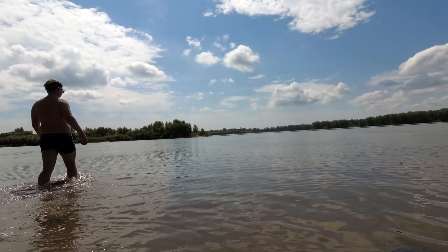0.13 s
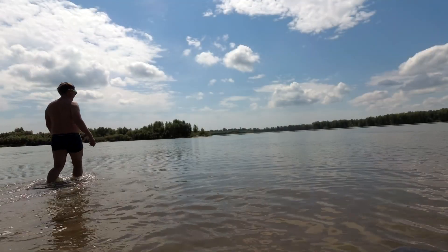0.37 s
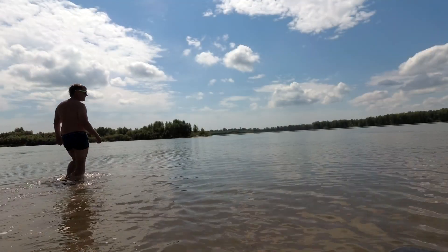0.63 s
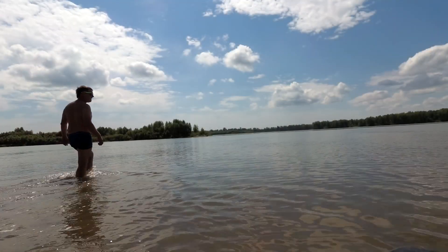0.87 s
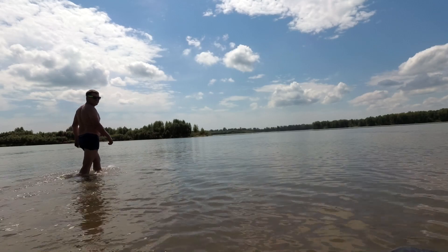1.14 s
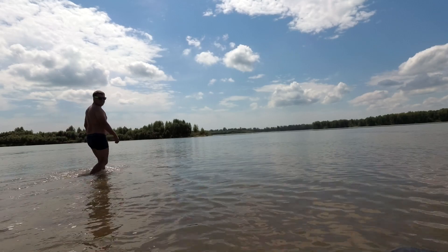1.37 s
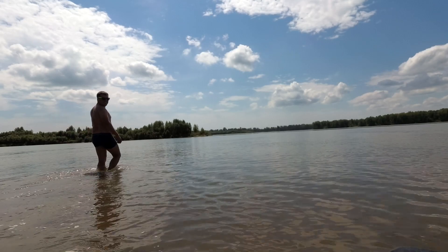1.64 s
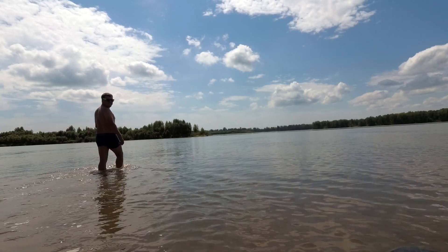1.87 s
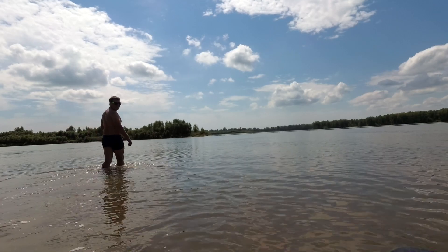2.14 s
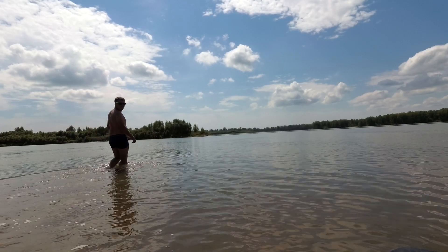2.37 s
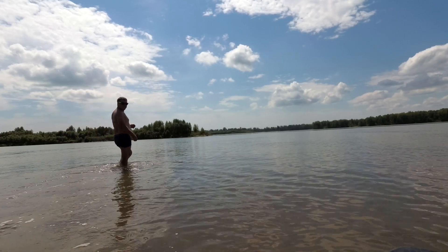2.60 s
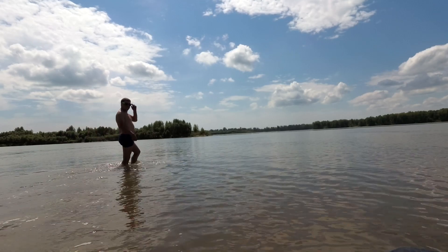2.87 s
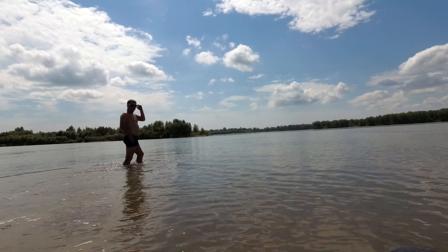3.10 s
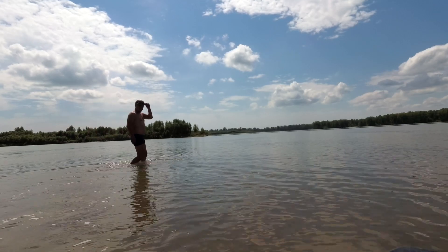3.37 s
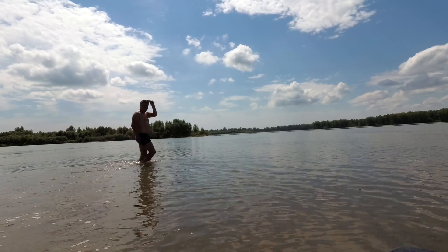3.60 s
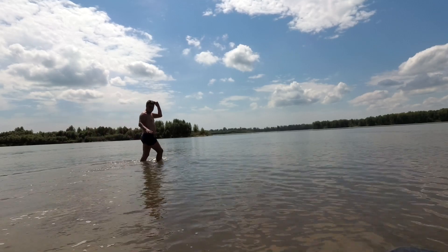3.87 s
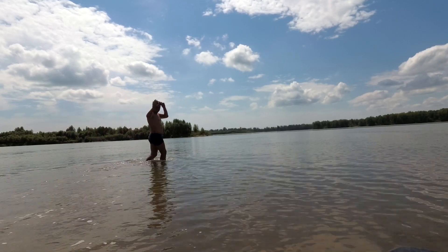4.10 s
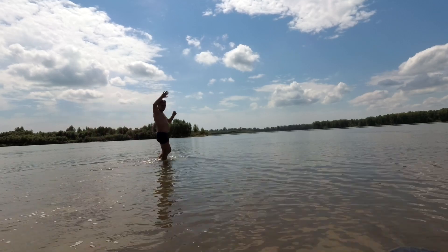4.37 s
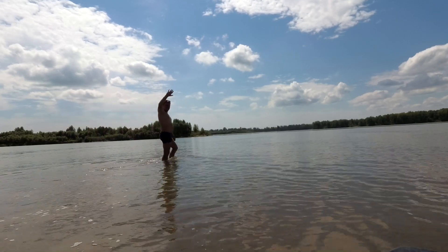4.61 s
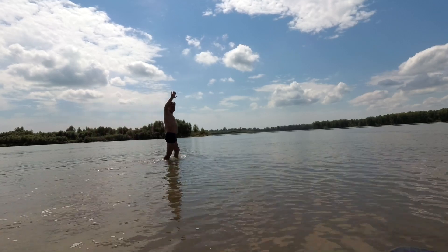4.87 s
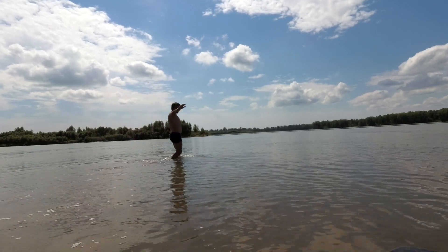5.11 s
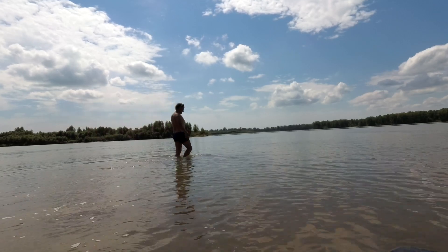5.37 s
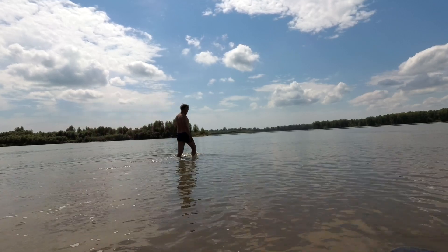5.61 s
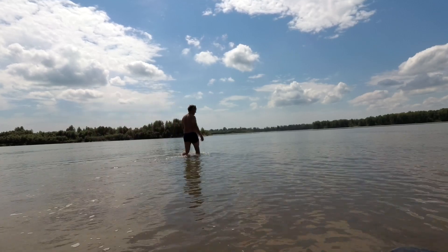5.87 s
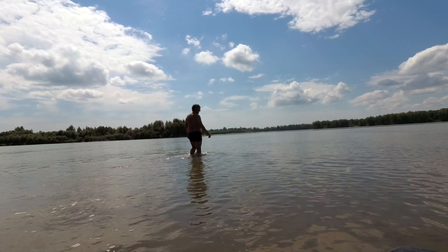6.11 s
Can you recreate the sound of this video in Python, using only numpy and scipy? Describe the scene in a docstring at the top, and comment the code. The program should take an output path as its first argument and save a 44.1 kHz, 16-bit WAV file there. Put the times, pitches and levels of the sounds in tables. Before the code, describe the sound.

Someone wades away through shallow river water, each stride sloshing, gurgling and splashing, while soft low wind thumps buffet the microphone, mostly on the right.

```python
"""A shallow river: a person wades away through it, a few metres from a small camera with two microphone ports.
Each stride stirs up ringing bubbles, slaps made of short noise bursts, and a crowd of tiny spray bubbles.
Wind eddies thump on the ports, mostly the right one, as soft low pulses over a lumpy rumble.
Under it lie coloured microphone hiss and a faint whine that ticks with the camera's frame clock."""
import sys
import numpy as np
from scipy import signal
from scipy.fft import rfft, irfft
from scipy.io import wavfile
from scipy.ndimage import uniform_filter1d

SR = 44100
rng = np.random.default_rng(int(sys.argv[2]) if len(sys.argv) > 2 else 0)


def gain_from_db(level_db):
    """Convert decibel levels to linear amplitude factors (20 dB per decade)."""
    decades = np.asarray(level_db, float) / 20
    return 10 ** decades


def dump(signal):
    """Clip the signal to [-1, 1] and save it as 16-bit WAV at the path in sys.argv[1]."""
    limited = np.clip(np.atleast_2d(signal).T, -1, 1)
    pcm = np.round(limited * 32767).astype(np.int16)
    wavfile.write(sys.argv[1], SR, pcm)


N = 275007  # samples in the scene


def evened(x):
    """Scales a signal to an average (rms) size of 1."""
    return x / np.sqrt(np.mean(x ** 2) + 1e-20)


def read(points, hz, column=1):
    """Reads a spectrum table between its rows, on a log-frequency axis."""
    table = np.transpose(points)
    return np.interp(np.log(hz + 1), np.log(table[0] + 1), table[column])


def curve(rows, column, t=None):
    """Reads one column of a time table, for every sample or for the times t."""
    table = np.transpose(rows)
    times = np.arange(N) / SR if t is None else t
    return np.interp(times, table[0], table[column])


def add(mix, s, sound):
    """Mixes a sound in from second s."""
    start = round(s * SR)
    sound = sound[max(-start, 0):]
    part = mix[max(start, 0):][:len(sound)]
    part += sound[:len(part)]


def noise(points, size, patchy_db, same):
    """Two channels of noise with a spectrum, drifting patches and a left-right likeness; rms 1 overall."""
    hz = np.fft.rfftfreq(size, 1 / SR)
    a, b, c, d, patches = rng.standard_normal((4 * N // size + 5, len(hz), 5)).T
    patches = uniform_filter1d(patches, size=8, axis=0)
    patches = evened(uniform_filter1d(patches, size=6, axis=1))
    likeness = np.clip(same(hz), -1, 1)[:, None]
    left = a + 1j * b
    right = likeness * left + np.sqrt(1 - likeness ** 2) * (c + 1j * d)
    z = np.array([left, right]) * gain_from_db(read(points, hz)[:, None] + patchy_db * patches)
    return evened(signal.istft(z, nperseg=size, noverlap=3 * size // 4)[1][:, :N])


# colour of the hiss: (frequency [Hz], relative level [dB])
HISS_COLOUR = [(180, -50), (300, -21.5), (565, -25.5), (749, 6), (842, -16), (1870, -19.5), (2400, -18),
               (10000, -20.5), (16000, -11)]
# how alike the hiss is at both ports: (frequency [Hz], likeness [0 to 1])
HISS_LIKENESS = [(300, 0.16), (1000, 0.71), (2500, 0.036), (6000, 0.64), (10000, 1), (13000, 0.12)]
# extra colour of the right port's hiss: (frequency [Hz], gain [dB])
HISS_RIGHT_GAIN = [(300, -12.5), (1800, 2.5), (3000, -1), (9000, 0), (14000, -2.5)]


def hiss(level_db=-53):
    """Microphone hiss and the far wash of the river: steady noise, partly shared by the two ports."""
    left, right = gain_from_db(level_db) * noise(HISS_COLOUR, 1024, 0.66, lambda hz: read(HISS_LIKENESS, hz))
    right_gain = gain_from_db(read(HISS_RIGHT_GAIN, np.fft.rfftfreq(N, 1 / SR)))
    return np.array([left, irfft(rfft(right) * right_gain, N)])


def thin_hiss(db=-70, low_hz=11700, high_hz=13400, start=4.61, end=5.45):
    """A faint band of treble noise that fades in and out once, louder on the left."""
    band = signal.butter(3, [low_hz, high_hz], "band", fs=SR, output="sos")
    sound = evened(signal.sosfilt(band, rng.standard_normal(N)))
    fade_s = [start - .05, start + .05, end - .1, end + .05]
    fade = np.interp(np.arange(N) / SR, fade_s, [0, 1, 1, 0])
    return sound * gain_from_db(db) * fade * gain_from_db([[3], [-6]])  # left and right gain, dB


# twin tones before some frames: (frequency [Hz], level before the left and right gains [dB])
PIP_TONES = [(12075, -60), (13835, -60)]
# how often the twin tones sound: (time [s], share of frames [0 to 1])
PIP_SHARE = [(0, .95), (.85, 1), (.95, 0.66), (4.55, 0.58), (4.62, 0.1), (5.42, .1), (5.48, 1), (5.76, 1),
             (5.79, 0.35), (6.24, 0.56)]


def whine(line_hz=15703, line_db=-70, waver_hz=6, tick_db=-58, tick_hz=15500, tick_ms=1.5):
    """A thin wavering line, a tick at every frame and short twin tones before some frames, louder on the left."""
    frame_hz, first_frame_s = 29.968, 0.0204
    pip_ms, pip_lead_ms = 4, 10.5
    t = np.arange(N) / SR
    frames = (t - first_frame_s) * frame_hz
    from_tick_ms = 1000 * ((frames + .5) % 1 - .5) / frame_hz
    # one chance and one phase for each frame
    chance, phase = rng.random((200, 2))[np.round(frames).astype(int)].T
    waver = waver_hz * evened(uniform_filter1d(rng.standard_normal(N), size=4000))
    line = gain_from_db(line_db) * np.sin(2 * np.pi * np.cumsum(line_hz + waver) / SR)
    tick_shape = np.exp(-(from_tick_ms / tick_ms) ** 2)
    ticks = gain_from_db(tick_db) * tick_shape * np.sin(2 * np.pi * (tick_hz * t + phase))
    gate = (chance < curve(PIP_SHARE, 1)) * np.exp(-((from_tick_ms + pip_lead_ms) / pip_ms) ** 4)
    pips = gate * sum(gain_from_db(db) * np.sin(2 * np.pi * (hz * t + phase)) for hz, db in PIP_TONES)
    return (line + ticks + pips) * gain_from_db([[3], [-12]])  # left and right gain, dB


def thump(hz, cycles, phase):
    """One eddy passing a port: a soft push and pull under a bell-shaped swell, centred 2000 samples in."""
    t = np.arange(-2000, 2000) / SR
    return np.exp(-.5 * (t * hz / cycles) ** 2) * np.cos(2 * np.pi * (hz * t + phase))


# colour of the wind rumble: (frequency [Hz], relative level [dB])
RUMBLE_COLOUR = [(15, -40), (30, -0.5), (60, 3), (120, 2.5), (200, 4.5), (280, -9.5), (400, -36),
                 (700, -34)]
# strength of the rumble, before the low cut on the left: (time [s], left level [dB], right level [dB])
GUST_LEVELS = [(0.0, -44.5, -44.5), (0.62, -43.5, -43.5), (1.3, -40.5, -46), (1.7, -58, -44.5),
               (1.95, -54, -45), (2.24, -60, -59.5), (2.5, -61, -53), (2.8, -49, -40), (3.01, -62, -58.5),
               (3.34, -52, -43), (3.55, -58, -50.5), (3.78, -62, -50), (4.12, -62, -58), (4.34, -44, -46.5),
               (4.63, -54.5, -52), (4.9, -40.5, -42.5), (5.28, -58.5, -46), (5.59, -40, -40.5),
               (6.24, -55, -47.5)]
# the strongest eddies, before the low cut on the left:
# (time of the middle [s], level [dB], frequency [Hz], port [0 left, 1 right])
STRONG_EDDIES = [(0.04, -30, 173, 0), (0.195, -40, 171, 0), (0.214, -24.5, 220, 1), (0.279, -39, 171, 0),
                 (0.3, -25, 181, 0), (0.399, -28.5, 172, 0), (0.447, -25.5, 119, 1), (0.47, -43.5, 150, 0),
                 (0.608, -28, 166, 1), (1.075, -26.5, 190, 1), (1.121, -27.5, 173, 0), (1.329, -26, 257, 1),
                 (1.364, -27, 170, 1), (1.364, -20.5, 190, 0), (1.4, -19, 204, 1), (1.425, -20, 215, 1),
                 (1.515, -26, 179, 1), (1.571, -21.5, 159, 1), (1.7, -14.5, 205, 1), (1.804, -12.5, 230, 1),
                 (1.873, -13.5, 190, 1), (2.039, -13.5, 214, 1), (2.074, -29, 150, 1),
                 (2.371, -23.5, 174, 1), (2.504, -22.5, 158, 1), (2.536, -19, 191, 1), (2.672, -20, 205, 1),
                 (2.705, -22, 175, 1), (2.808, -27.5, 112, 1), (2.817, -25.5, 165, 0), (2.858, -25, 181, 1),
                 (3.069, -30.5, 146, 1), (3.236, -28, 166, 1), (3.29, -17, 177, 1), (3.391, -21, 180, 1),
                 (3.423, -25, 162, 1), (3.511, -26, 189, 1), (3.544, -27, 151, 1), (3.588, -33, 159, 1),
                 (4.342, -25.5, 171, 1), (4.395, -16.5, 183, 1), (4.519, -34, 155, 1),
                 (4.568, -24.5, 178, 1), (4.82, -12.5, 219, 1), (4.887, -15, 210, 1), (4.915, -25, 170, 1),
                 (4.952, -28, 194, 1), (5.052, -23.5, 200, 1), (5.072, -24, 142, 1), (5.114, -29, 158, 1),
                 (5.172, -29, 182, 1), (5.215, -27.5, 133, 1), (5.312, -31, 139, 1), (5.413, -20.5, 173, 1),
                 (5.439, -24, 193, 1), (5.462, -26, 123, 1), (5.496, -20.5, 197, 1), (5.673, -20, 168, 1),
                 (5.702, -26, 160, 1), (5.831, -23.5, 162, 1), (5.911, -28.5, 153, 1),
                 (5.966, -20.5, 197, 1)]


def wind(cycles=0.49, lump_db=5, lump_ms=18, push_db=-17, follower_db=-7, follower_ms=16, left_cut_hz=70):
    """Eddies roll over one port at a time, each with smaller ones around it, above a lumpy rumble."""
    lumps = evened(uniform_filter1d(rng.standard_normal((2, N)), round(lump_ms * SR / 1000)))
    rumble = noise(RUMBLE_COLOUR, 2048, 0.14, lambda hz: 0 * hz)  # unrelated at the two ports
    rumble = evened(rumble * gain_from_db(lump_db * lumps))
    out = rumble * gain_from_db([curve(GUST_LEVELS, 1), curve(GUST_LEVELS, 2)])
    for (s, db, hz, port), luck in zip(STRONG_EDDIES, rng.random((len(STRONG_EDDIES), 8))):
        at, start = out[int(port > .5)], s - 2000 / SR
        slow_push = gain_from_db(push_db) * thump(0.5 * hz, 0.16, luck[1])
        add(at, start, gain_from_db(db) * (thump(hz, cycles, luck[0]) + slow_push))
        # one smaller eddy before and one after
        for way, (phase, gap, pitch) in zip((-1, 1), luck[2:].reshape(2, 3)):
            small = gain_from_db(db + follower_db - 17.7 * gap) * thump(hz * (.7 + .7 * pitch), cycles, phase)
            add(at, start + way * follower_ms * (0.658 + 0.79 * gap) / 1000, small)
    # the left port is sheltered
    low_cut = signal.butter(2, left_cut_hz, "high", fs=SR, output="sos")
    out[0] = signal.sosfilt(low_cut, out[0])
    return out


# how the camera body colours the water at the right port:
# (frequency [Hz], gain [dB], phase ahead of the left [rad])
RIGHT_PORT_COLOUR = [(300, -3, 0.5), (500, -2.5, -0.15), (863, -1, 0.01), (910, -7.5, 1.25),
                     (1264, -1.5, -1.1), (1340, -4, 0.1), (1630, -12, -0.2), (1810, -7.5, 1.32),
                     (2400, 3.5, 2), (3250, 3, 0.83), (5300, 7.5, 1.9), (12100, 5.5, 2)]
# what changes with the wader's bearing: (time [s], left notch [Hz], mean lag of the left port [ms])
WADER_BEARING = [(0, 1040, -0.058), (3, 1130, -0.012), (4.5, 1256, 0.036), (6.24, 1235, 0.06)]


def at_ports(water, notch_db=12, notch_width_hz=50, scatter_ms=0.05):
    """The camera body cuts a notch at the left port and colours the right; notch and lag move with the bearing."""
    hz, t, z = signal.stft(water, SR, nperseg=1024, noverlap=768)
    hz = hz[:, None]
    notch = np.exp(-((hz - curve(WADER_BEARING, 1, t)) / notch_width_hz) ** 2)
    left = z * gain_from_db(-notch_db * notch)
    # the splashing is spread over some metres, so the lag between the ports wanders
    wander = uniform_filter1d(rng.standard_normal(z.shape), size=9, axis=0)
    wander = evened(uniform_filter1d(wander, size=3, axis=1))
    lag_ms = curve(WADER_BEARING, 2, t) + scatter_ms * wander
    turn = read(RIGHT_PORT_COLOUR, hz, column=2) + 2 * np.pi * hz * lag_ms / 1000
    right = z * gain_from_db(read(RIGHT_PORT_COLOUR, hz)) * np.exp(1j * turn)
    return signal.istft(np.array([left, right]), SR, nperseg=1024, noverlap=768)[1][:, :N]


# water slaps and drop impacts, before the burst is shaped and reaches the ports:
# (time [s], level [dB], brightest frequency [Hz])
SLAP_EVENTS = [(0.059, -32, 3830), (0.4978, -31.5, 3110), (0.5202, -21.5, 3200), (0.558, -32, 3240),
               (0.6132, -30, 4230), (0.6482, -29, 3120), (0.987, -34, 3100), (1.1157, -37.5, 5410),
               (1.6018, -35, 3150), (1.88, -38, 3170), (2.2712, -40, 5430), (2.4515, -30.5, 4000),
               (2.4637, -31.5, 7550), (2.5227, -31, 2980), (2.535, -39, 4180), (2.6173, -33, 3010),
               (2.726, -32, 3020), (2.821, -35.5, 3100), (3.5997, -40, 3270), (4.2384, -41, 3290),
               (4.6788, -39, 9600), (4.709, -34, 9150), (5.29, -30, 8860), (5.3998, -32, 3050),
               (5.959, -33, 6540), (6.118, -38, 4550), (6.152, -38, 5830)]


def slaps(width=0.25, skirt=0.47, rise_s=0.0033, decay_ms=3.46):
    """A drop or a sheet of water hits the surface: a ragged burst of bright noise."""
    out, t = np.zeros(N), np.arange(2048) / SR
    hz = np.fft.rfftfreq(2048, 1 / SR)
    shape = np.minimum(t / rise_s, 1) * np.exp(-1000 * t / decay_ms)
    draws = rng.standard_normal((len(SLAP_EVENTS), 2, 2048))
    for (s, db, top_hz), (burst, rag) in zip(SLAP_EVENTS, draws):
        peak = np.exp(-(np.log((hz + 1) / top_hz) / width) ** 2)
        colour = (skirt * (hz < 11000) + peak) * (hz > 1500)
        ragged = gain_from_db(2.2 * evened(uniform_filter1d(rag, size=60)))
        burst = evened(irfft(rfft(burst) * colour) * ragged)
        add(out, s, gain_from_db(db) * burst / 2 * shape)
    return out


# surges of water as a leg pushes or plants, levels relative:
# (start [s], length [s], middle bubbles [dB], large bubbles [dB], spray [dB])
LEG_SURGES = [(-0.05, 0.049, -29, -32, -46.5), (0.15, 0.085, -44, -61, -56), (0.469, 0.21, -40, -42, -51.5),
              (0.726, 0.38, -41.5, -34.5, -54), (1.554, 0.072, -43.5, -50, -55.5),
              (1.666, 0.23, -44, -37.5, -55.5), (1.98, 0.77, -53.5, -45.5, -63.5),
              (2.362, 0.15, -47.5, -47, -59), (2.59, 0.13, -44, -52.5, -58),
              (2.775, 0.19, -46.5, -45, -62.5), (2.975, 0.045, -64, -45.5, -69),
              (3.138, 0.037, -54, -51, -65), (3.56, 0.084, -45.5, -51, -61), (3.694, 0.1, -45, -43, -58),
              (3.88, 0.25, -55, -52.5, -62), (4.196, 0.17, -50, -54, -61.5), (4.458, 0.14, -50, -52.5, -61),
              (4.621, 0.12, -45.5, -42, -56.5), (5.108, 0.14, -50, -53.5, -57.5),
              (5.268, 0.13, -44, -37.5, -54.5), (5.426, 0.37, -44, -36, -54),
              (5.856, 0.45, -48.5, -53, -56.5)]


def stirring(column, pace, wake_db=-16.5, wake_fall=8.1):
    """Level in dB of one size of bubble: every surge rises, sags while the leg pushes, then dies into its wake."""
    rise_s, sag, fall = pace  # seconds, dB/s while pushing, dB/s afterwards
    t = np.arange(0, N + 64, 64) / SR
    power = 1e-10
    for row in LEG_SURGES:
        since = np.maximum(t - row[0], 0)
        after = np.maximum(since - row[1], 0)
        # a quick fall, plus lingering ripples that start weaker and fade slowly
        dying = gain_from_db(-fall * after) ** 2 + gain_from_db(wake_db - wake_fall * after) ** 2
        push = np.minimum(since / rise_s, 1) * gain_from_db(row[column] - sag * (since - after))
        power = power + push ** 2 * dying
    return np.interp(np.arange(N) / SR, t, 10 * np.log10(power))


def bubble(hz, ring_ms, rise, phase):
    """A pocket of air is pinched off, rings and dies; its pitch climbs as it nears the surface. Swell peaks at 1."""
    fall_s = ring_ms / 1000 / 1.2
    u = np.arange(0, 7 * fall_s, 1 / SR) / fall_s
    shape = (1 - np.exp(-4 * u)) * np.exp(-u)
    turns = np.cumsum(hz * (1 + rise * (u - .5))) / SR
    sound = shape / shape.max() * np.sin(2 * np.pi * (turns + phase))
    return np.argmax(shape) / SR, sound  # seconds to the peak, and the sound


# balance of the bubble crowd by size: (pitch [Hz], relative level [dB])
CROWD_BALANCE = [(220, -4), (350, 6.5), (500, 5.5), (800, 3.5), (1100, 6), (1800, 7), (2300, -2.5),
                 (3200, 3.5), (6000, 0.5), (10000, 2)]


def bubble_crowd(per_s=90, spread_db=3.0, cycles=5.91, clump_db=3.5, clump_ms=25, spray_clump=0.06,
                 each_size_db=-17):
    """Many small bubbles of all sizes, born in clumps; large, middle and tiny ones each follow the stirring."""
    middle_db = stirring(column=2, pace=(0.02, 2.67, 126))
    large_db = stirring(column=3, pace=(0.077, 9, 60))
    spray_db = stirring(column=4, pace=(0.048, 5.5, 68))
    clumps = uniform_filter1d(rng.standard_normal((3, N)), round(clump_ms * SR / 1000))
    clumps = clump_db * evened(clumps)
    out = np.zeros(N)
    for hz in np.geomspace(220, 10500, num=48):
        chance, size, (length, rise, phase) = rng.random(N), rng.exponential(1, N), rng.random(3)
        large, spray = np.interp(hz, [900, 1200], [1, 0]), np.interp(hz, [2400, 3200], [0, 1])
        clump = large * clumps[0] + 0.55 * (1 - spray) * clumps[1] + spray_clump * spray * clumps[2]
        # smaller bubbles are born more often
        born = chance < per_s * (hz / 1000) ** 1.05 / SR
        births = born * gain_from_db(spread_db * np.minimum(size, 4) + clump)
        level_db = (1 - large - spray) * middle_db + large * large_db + spray * spray_db
        level_db = level_db + read(CROWD_BALANCE, hz) + each_size_db
        grain = bubble(hz, 1000 * cycles * (.5 + length) / hz, 0.1605 * rise, phase)[1]
        grain = grain / np.linalg.norm(grain)
        out += signal.oaconvolve(evened(births) * gain_from_db(level_db), grain)[:N]
    return out


# the clearest bubbles, before they reach the ports:
# (time of the peak [s], peak level [dB], pitch [Hz], ring length [ms])
CLEAR_BUBBLES = [(0.012, -22.5, 630, 7.7), (0.018, -23, 1390, 2.7), (0.025, -24, 436, 9.7),
                 (0.038, -22.5, 786, 5), (0.055, -22, 1840, 1.6), (0.208, -18.5, 700, 7.2),
                 (0.229, -32.5, 667, 12), (0.269, -24.5, 1460, 2), (0.5, -33.5, 500, 10.7),
                 (0.544, -32, 697, 6.7), (0.523, -24, 1960, 4), (0.524, -19, 735, 5.5),
                 (0.568, -26, 328, 7.3), (0.59, -27.5, 240, 11.7), (0.618, -29.5, 207, 17),
                 (0.644, -26, 1330, 1.1), (0.677, -23.5, 690, 6), (0.739, -30, 470, 12.3),
                 (0.772, -26.5, 772, 6.1), (0.785, -26, 437, 7.2), (0.817, -25.5, 436, 5.6),
                 (0.832, -29.5, 435, 8.1), (0.858, -28.5, 771, 9.8), (0.909, -25.5, 327, 21),
                 (0.916, -28, 1780, 2.5), (0.936, -23, 430, 4.2), (1.009, -26.5, 1650, 1.3),
                 (1.085, -27, 325, 9.9), (1.118, -30, 1720, 2), (1.266, -35, 1250, 5.5),
                 (1.331, -23, 277, 2.5), (1.59, -28.5, 870, 3), (1.597, -26, 1220, 1.6),
                 (1.618, -33.5, 1920, 4), (1.635, -31, 815, 4), (1.711, -34, 378, 7.2),
                 (1.776, -26.5, 517, 8.2), (1.755, -34.5, 555, 6.5), (1.782, -29, 1200, 3.5),
                 (1.797, -23.5, 447, 3.5), (1.864, -27.5, 1600, 1.7), (1.884, -27.5, 1570, 3.2),
                 (1.956, -31, 637, 4.6), (1.962, -34, 248, 15), (1.989, -36, 627, 6.4),
                 (2.098, -35, 660, 8.3), (2.192, -36.5, 686, 9.6), (2.6, -22.5, 1350, 1.46),
                 (2.607, -33, 596, 8.7), (2.618, -19, 2090, 0.96), (2.675, -29, 1330, 1.5),
                 (2.698, -30, 570, 3.4), (2.736, -33.5, 715, 8.8), (2.747, -30, 417, 7.9),
                 (2.844, -33.5, 458, 8.7), (2.979, -38.5, 880, 8.1), (3.028, -40, 740, 11),
                 (3.198, -42, 2690, 2), (3.202, -39, 727, 5.7), (3.666, -29, 1190, 2.3),
                 (3.744, -33, 795, 1.9), (3.748, -36, 377, 8.8), (3.795, -30.5, 864, 5.7),
                 (3.805, -33, 1780, 5.6), (3.815, -35, 520, 7.3), (4.047, -40.5, 446, 10),
                 (4.245, -45, 1660, 6), (4.287, -34.5, 488, 8.5), (4.336, -40, 1550, 3.7),
                 (4.425, -33.5, 1410, 2.6), (4.488, -34, 754, 15), (4.518, -35, 730, 9.1),
                 (4.57, -32.5, 890, 2.4), (4.616, -43, 424, 11.4), (4.666, -41, 820, 8.4),
                 (4.712, -35, 1820, 2.5), (4.739, -38, 770, 7.7), (4.856, -41, 1610, 6.1),
                 (4.865, -30, 460, 4.7), (4.974, -35.5, 753, 4), (5.213, -38.5, 605, 6.7),
                 (5.221, -32, 730, 5.4), (5.29, -32.5, 790, 3.2), (5.319, -27.5, 810, 14),
                 (5.371, -27, 853, 14), (5.38, -29, 1006, 5.7), (5.445, -33.5, 300, 9.9),
                 (5.459, -33, 540, 8.1), (5.516, -29, 880, 2.9), (5.494, -31, 1280, 4.4),
                 (5.495, -32.5, 812, 9.7), (5.53, -28.5, 880, 4.5), (5.578, -27, 1670, 3.2),
                 (5.591, -29, 410, 11.3), (5.61, -35, 422, 8.7), (5.667, -26, 470, 4.6),
                 (5.701, -28.5, 425, 7.2), (5.752, -34, 775, 4.9), (5.762, -30.5, 863, 6.5),
                 (5.796, -34.5, 250, 10.3), (5.973, -33.5, 415, 11.4), (6.021, -29.5, 1820, 3.5),
                 (6.098, -38, 740, 12.3), (6.153, -34, 1310, 5), (6.233, -29, 920, 2.1)]


def clear_bubbles():
    """The bubbles that stand out one by one, each a ringing pocket of air with a slightly climbing pitch."""
    out = np.zeros(N)
    draws = rng.random((len(CLEAR_BUBBLES), 2))
    for (s, db, hz, ring_ms), (rise, phase) in zip(CLEAR_BUBBLES, draws):
        lead_s, sound = bubble(hz, ring_ms, 0.12 * rise, phase)
        add(out, s - lead_s, gain_from_db(db) * sound)
    return out


def scene():
    """Water through the two ports, plus wind, hiss and whine."""
    water = slaps() + bubble_crowd() + clear_bubbles()
    return hiss() + thin_hiss() + whine() + wind() + at_ports(water)


def top_cut(x):
    """Nothing passes above the cut-off."""
    return signal.sosfilt(signal.butter(12, 16300, fs=SR, output="sos"), x)


def record(dry):
    """A steep filter removes the treble above about 15.8 kHz."""
    edge = signal.firwin(801, 15830, window=("kaiser", 10), fs=SR)
    mix = signal.oaconvolve(dry, edge[None], "same")
    return top_cut(mix)


dry = scene()
out = record(dry)
dump(out)
```